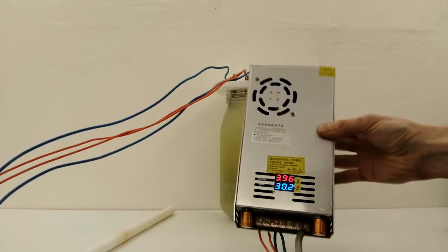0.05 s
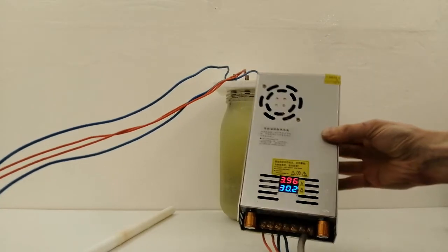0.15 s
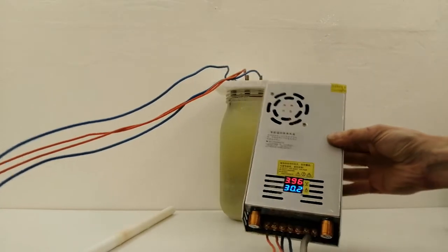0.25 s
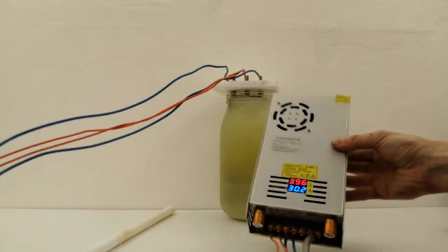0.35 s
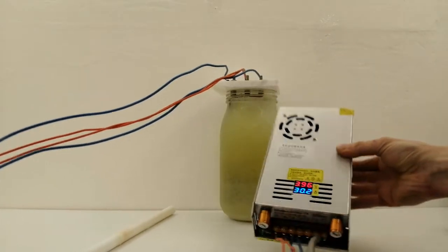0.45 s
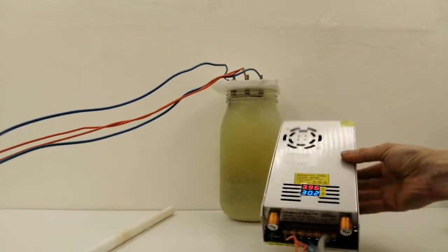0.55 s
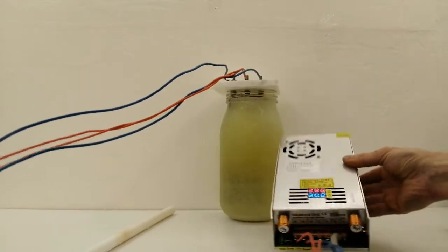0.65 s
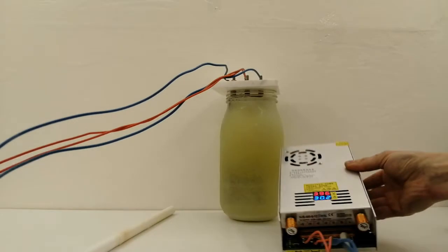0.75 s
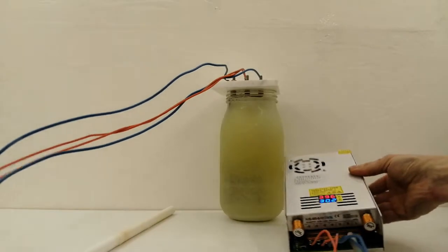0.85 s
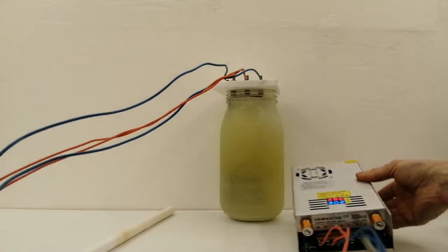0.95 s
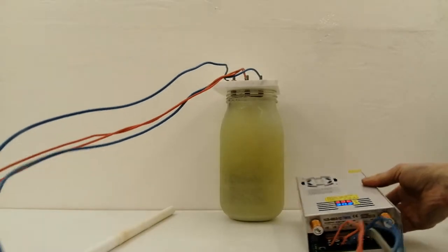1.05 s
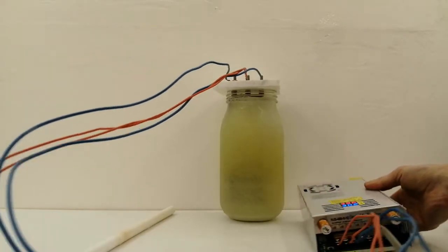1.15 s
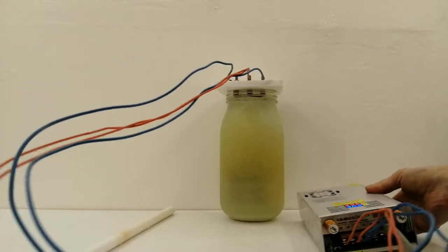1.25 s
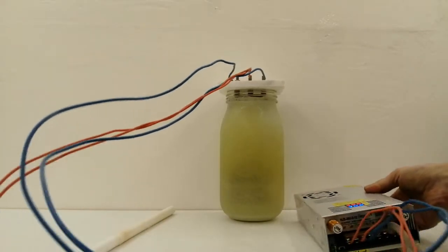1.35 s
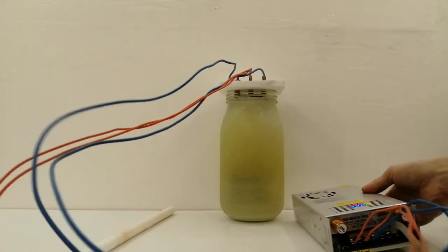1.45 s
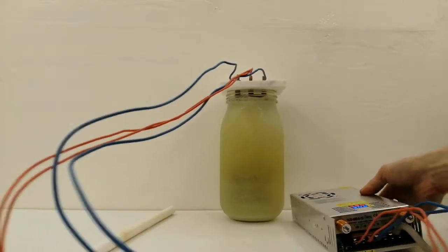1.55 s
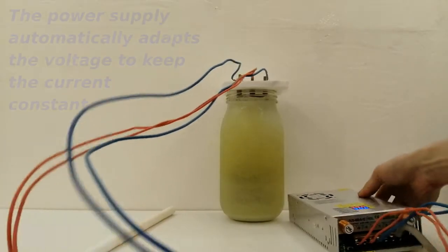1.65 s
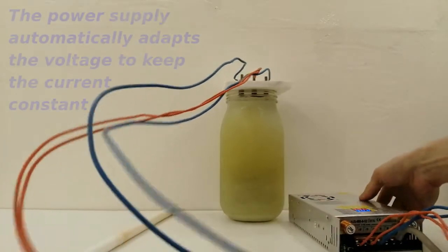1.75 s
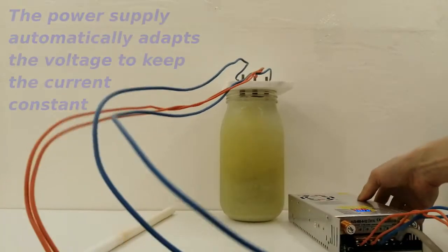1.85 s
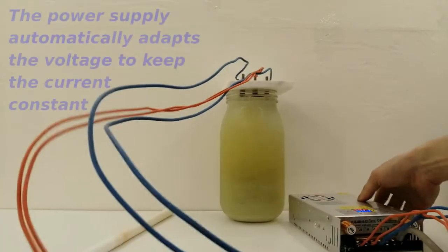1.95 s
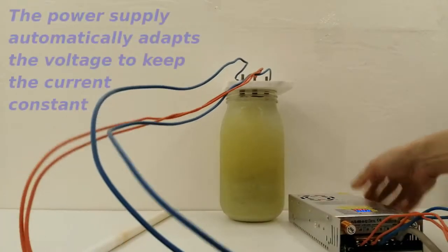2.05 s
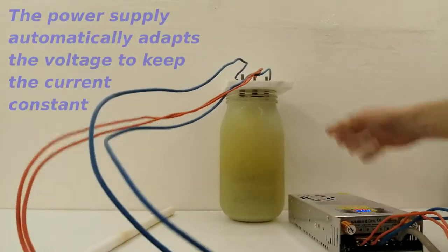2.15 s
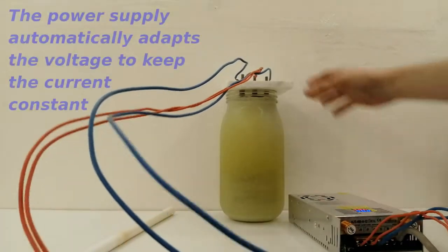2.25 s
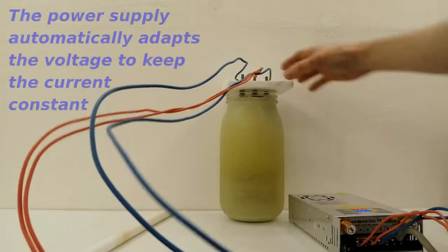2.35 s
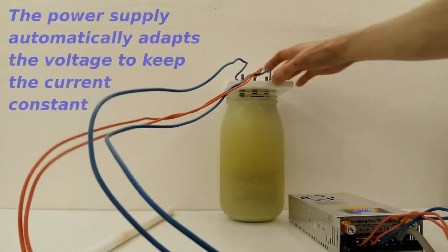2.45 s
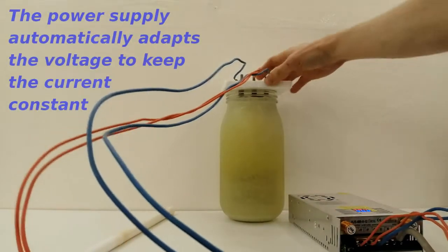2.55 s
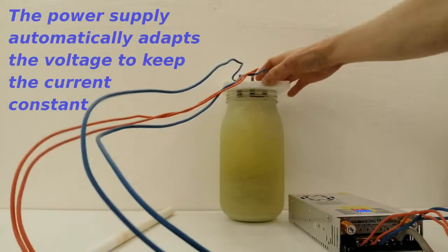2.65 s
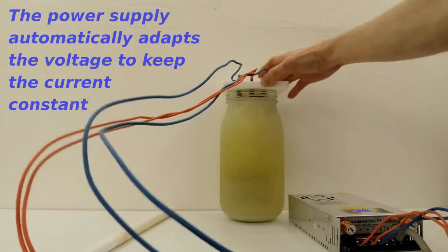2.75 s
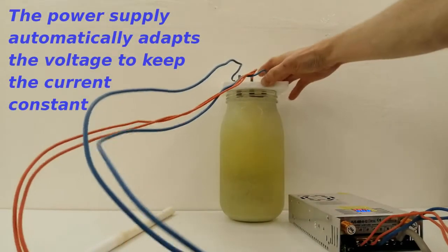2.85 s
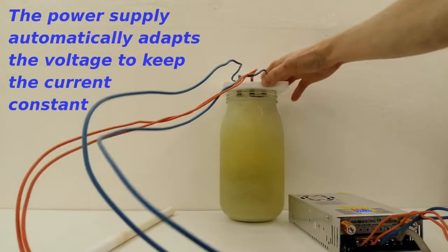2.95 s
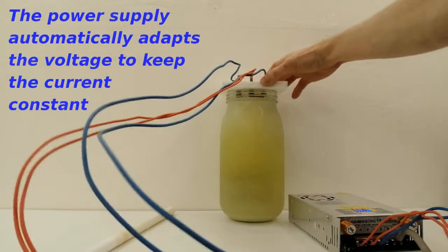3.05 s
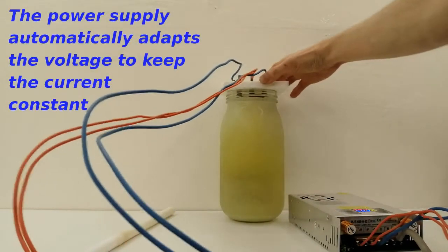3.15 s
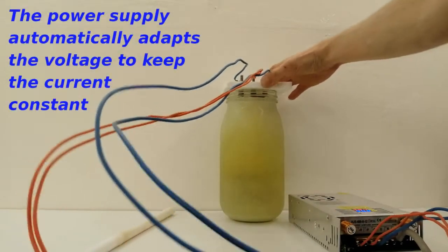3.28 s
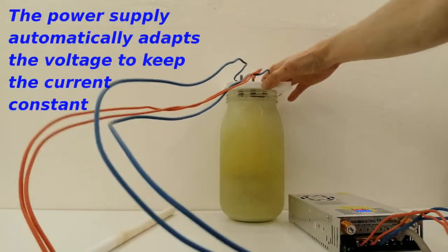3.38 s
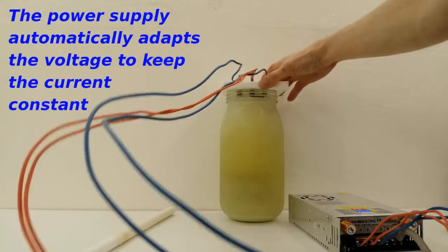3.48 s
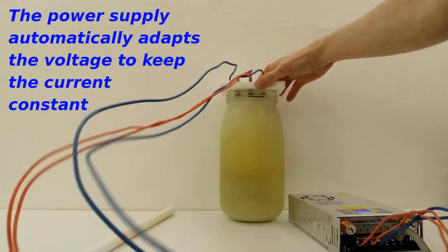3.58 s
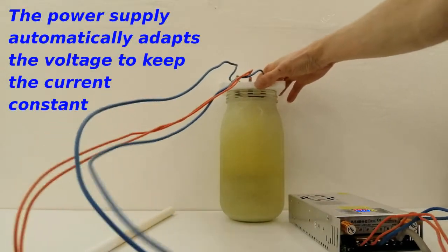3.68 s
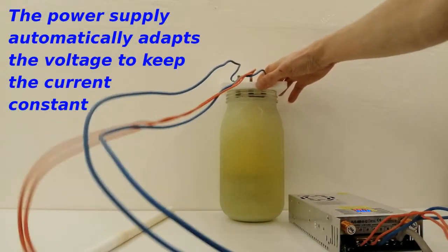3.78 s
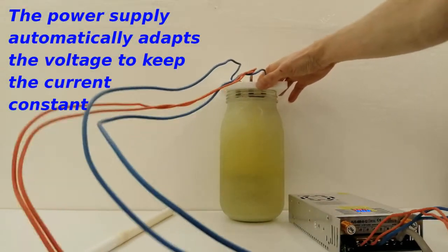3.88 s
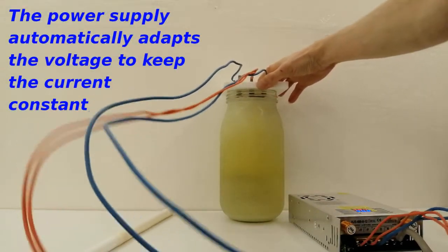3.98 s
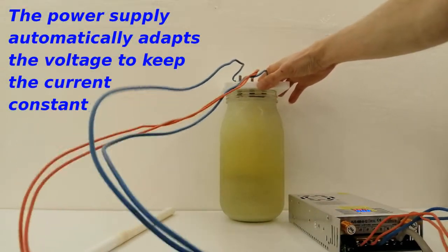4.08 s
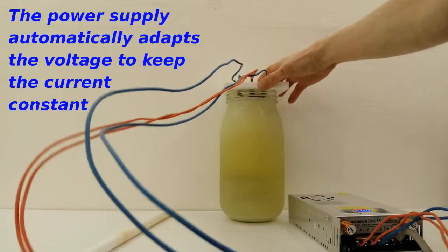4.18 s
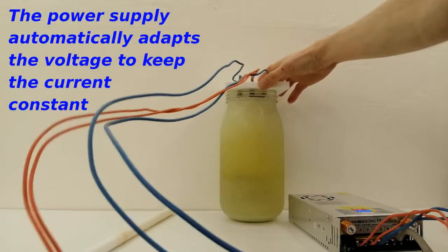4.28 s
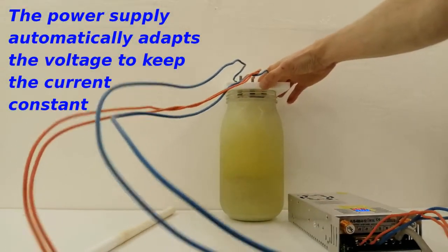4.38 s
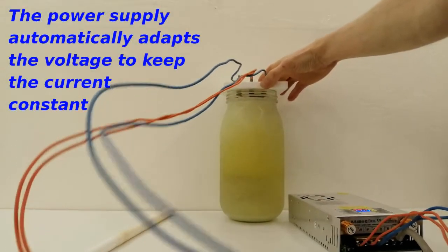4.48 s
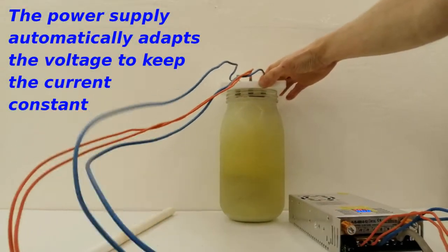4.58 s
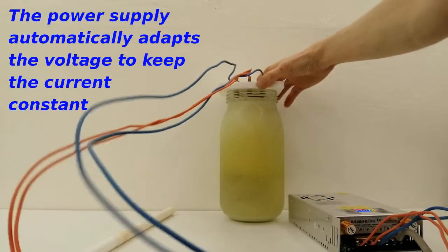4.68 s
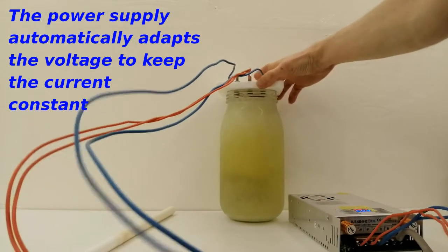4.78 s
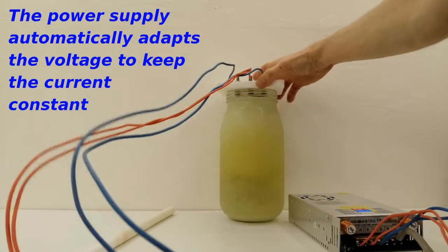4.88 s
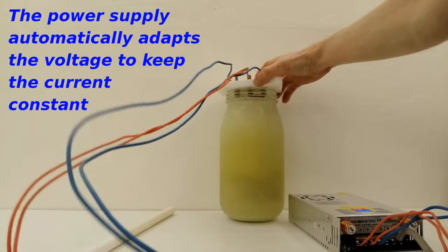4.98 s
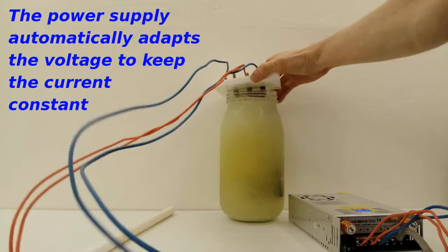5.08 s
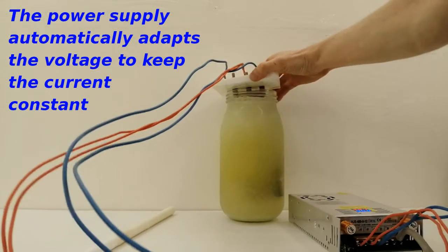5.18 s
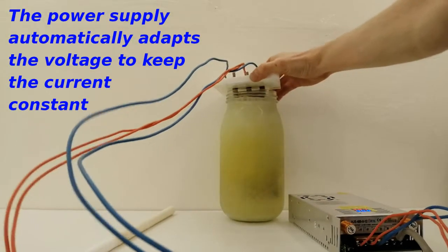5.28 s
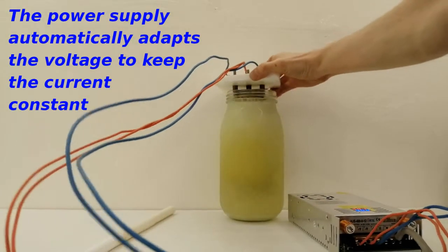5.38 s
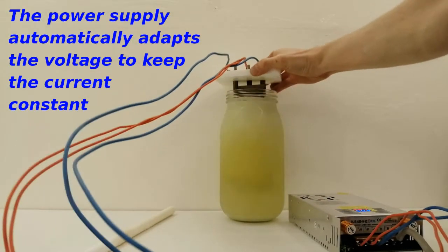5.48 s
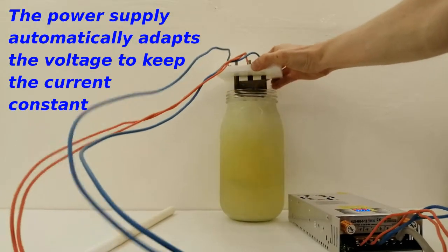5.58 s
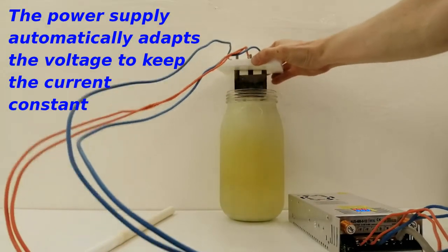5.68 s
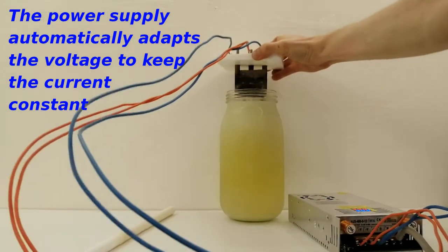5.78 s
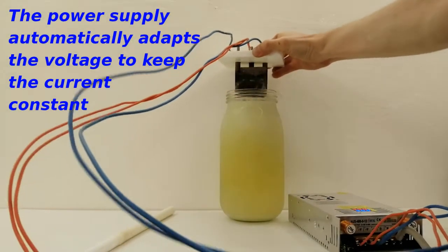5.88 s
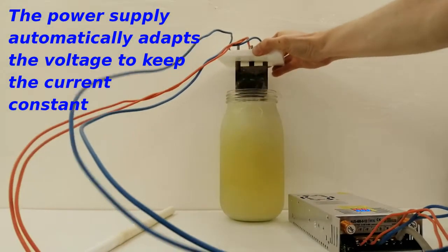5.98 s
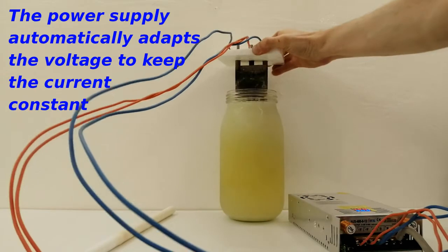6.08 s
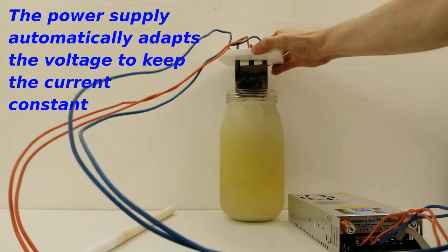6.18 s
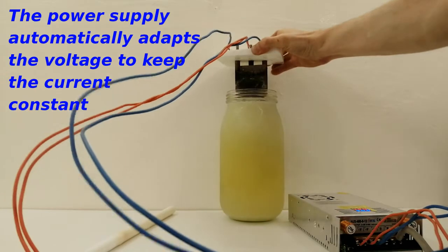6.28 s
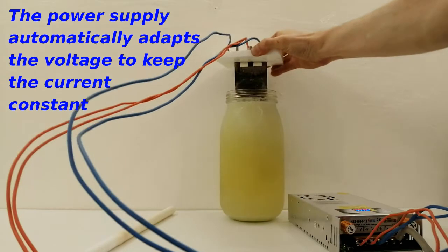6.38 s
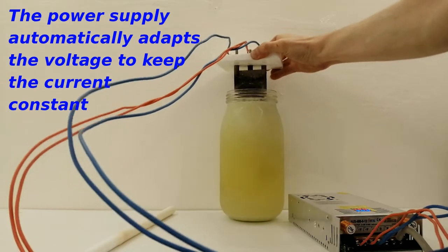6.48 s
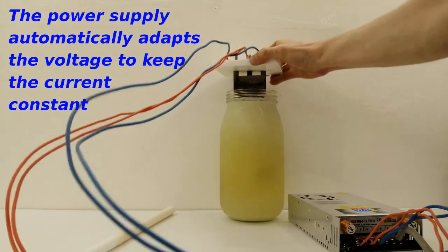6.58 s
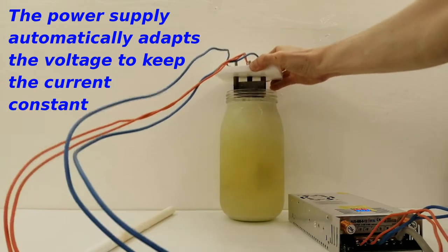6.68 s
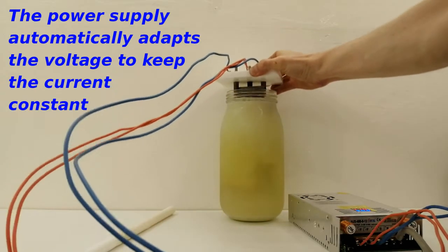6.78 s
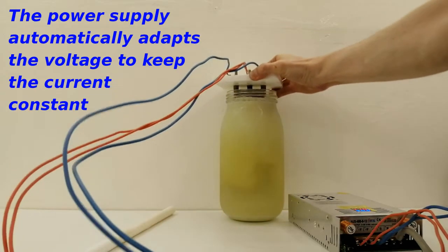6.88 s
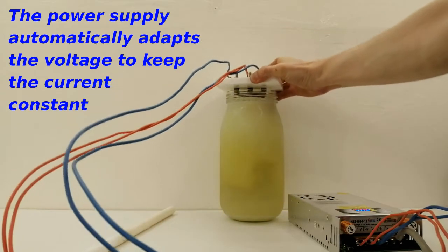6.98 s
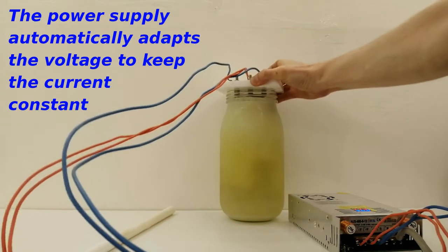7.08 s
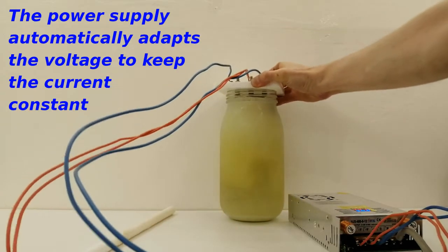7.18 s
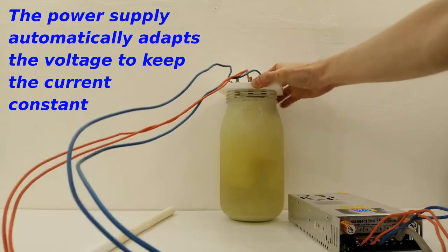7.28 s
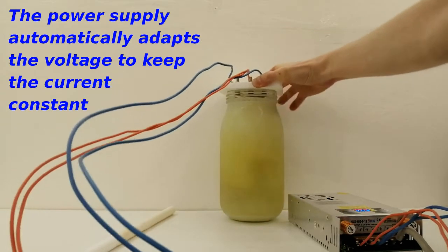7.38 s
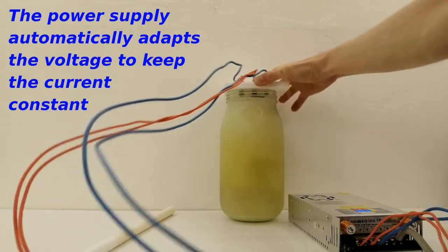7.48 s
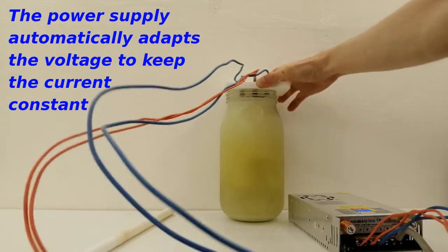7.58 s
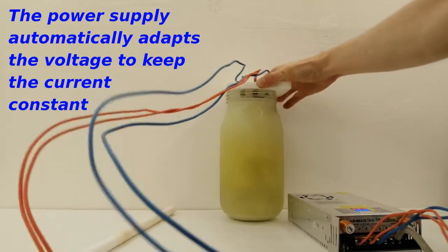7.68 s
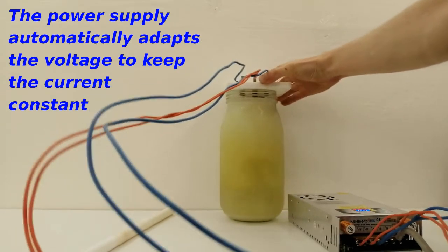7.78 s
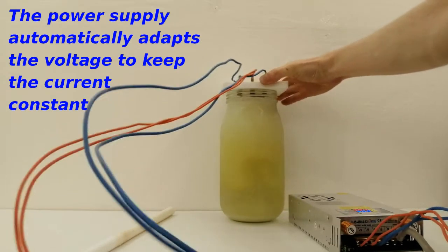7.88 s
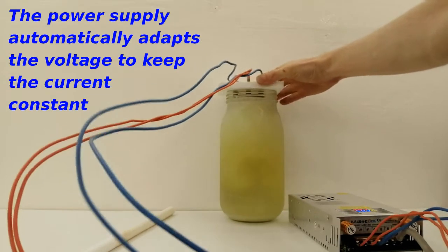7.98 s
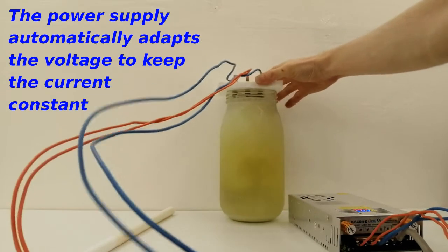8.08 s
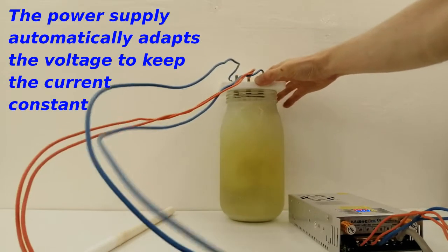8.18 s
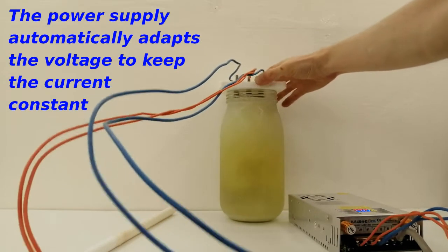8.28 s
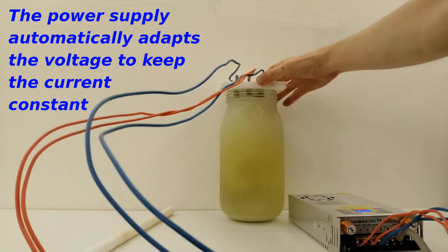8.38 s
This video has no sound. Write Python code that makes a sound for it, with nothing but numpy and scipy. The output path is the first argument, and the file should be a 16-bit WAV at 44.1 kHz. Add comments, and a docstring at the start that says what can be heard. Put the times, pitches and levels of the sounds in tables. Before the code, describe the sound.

A metal box knocks onto a table and scrapes aside, then a jar lid is tugged open, releasing bright fizz before knocking shut.

```python
"""Faint taps and short low tones over steady hiss, then a sheet-metal power supply knocks down on a
table in a small room, is shoved aside with drone and scrape, and let go. Fingers rub and tug the lid
off a glass electrolysis jar; open liquid fizzes, cutting out briefly, until the lid knocks back on.
Knocks are ringing modes plus a noise wash; rubs and fizz are coloured random grains; the low tones
and table sway are sines."""
import sys
import numpy as np
from scipy import signal
from scipy.fft import rfft, irfft, next_fast_len
from scipy.io import wavfile

SR = 44100
rng = np.random.default_rng(int(sys.argv[2]) if len(sys.argv) > 2 else 0)


def store_wav(level_fs):
    """Save 16-bit WAV to argv[1]."""
    pcm = np.round(np.clip(np.atleast_2d(level_fs), -1, 1) * 32767)
    wavfile.write(sys.argv[1], SR, pcm.T.astype(np.int16))


N = 372071
FFT_LEN = next_fast_len(N)
TIME_S, BIN_HZ = np.arange(N) / SR, np.fft.rfftfreq(FFT_LEN, 1 / SR)


def amp(db):
    """Decibels to gain."""
    return 10 ** (np.asarray(db) / 20)


def at_hz(points, hz):
    """Read a spectrum along a log-frequency axis."""
    f, value = np.transpose(points)
    return np.interp(np.log(np.maximum(hz, 1)), np.log(f), value)


def shaped(x, response):
    """Filter by a response given on the frequency bins."""
    return irfft(rfft(x, FFT_LEN) * response, FFT_LEN)[..., :N]


# left-right likeness: (frequency [Hz], correlation [-1..1])
LIKENESS = [(60, 0.75), (150, 0.44), (300, 0.87), (600, 0.18), (1200, 0.14), (3000, 0.22), (8000, .03)]


def stereo(mid, side, hz):
    """The channels are more alike in the bass than in the treble."""
    alike = np.clip(at_hz(LIKENESS, hz), -.99, .99)
    side = side * np.sqrt((1 - alike) / (1 + alike))
    return np.array([mid + side, mid - side])


def coloured(source, spectrum, body=1):
    """Two white sources, mid and side, take on a spectrum in dB per Hz, times a body response."""
    gain = amp(at_hz(spectrum, BIN_HZ)) * body * np.sqrt(SR / 2)
    mid, side = rfft(source, FFT_LEN) * gain
    return irfft(stereo(mid, side, BIN_HZ), FFT_LEN)[:, :N]


def grains(per_s, spread_db, room_t60_s=0.21):
    """Random tiny impacts of uneven size, each trailed by the room; mid and side, rms 1."""
    occurs = rng.random(N) < per_s / SR
    size = amp(spread_db * np.minimum(rng.exponential(1, N), 3))
    clicks = occurs * size * rng.choice([-1, 1], N)
    t = TIME_S[:SR // 4]
    room = rng.standard_normal((2, len(t))) * amp(-60 * t / room_t60_s)
    room[0, 0] = np.linalg.norm(room[0])   # direct sound, mid only
    x = signal.fftconvolve(clicks[None], room, axes=1)[:, :N]
    return x / x.std(axis=1, keepdims=True)


def resonant(modes, lift_db, width_hz):
    """Response of a rubbed body: its modes stand out, broadened by the touch."""
    response = 1
    for hz, db, _ in modes:
        response = response + amp(lift_db + db) / (1 + (2 * (BIN_HZ - hz) / width_hz) ** 2)
    return response


def wavering(per_s, depth_db):
    """A gain that wanders at random."""
    steps = rng.standard_normal(N // 100)
    return amp(depth_db * np.interp(TIME_S * per_s, np.arange(len(steps)), steps))


def gestures(rows, rise_s, easing_db_per_s, stop_t60_s):
    """A hand movement speeds up, eases off and dies away; one gain in time per dB column."""
    out = 0
    for start_s, length_s, *levels_db in rows:
        t = np.maximum(TIME_S - start_s, 0)
        stop_db = 60 * np.maximum(t - length_s, 0) / np.array(stop_t60_s)[:, None]
        fall_db = np.minimum(easing_db_per_s * t + stop_db, 200)
        rise = np.minimum(t / rise_s, 1)
        out = np.maximum(out, amp(levels_db)[:, None] * rise * amp(-fall_db))
    return out


def force(hz, force_db, weight_db, contact_hz, resonance_db, click_db, click):
    """Blow spectrum: a push peaking near the contact pitch and falling above, plus an edge click."""
    weight = weight_db / (1 + (hz / 214) ** 4)   # mass behind the blow counts below 214 Hz
    octaves = np.log2(hz / contact_hz)
    spring = resonance_db * np.exp(-octaves ** 2)   # 1 octave half-width
    push = amp(force_db + weight + spring) / np.hypot(1, (hz / contact_hz) ** 3.05)
    return np.hypot(push, amp(click_db + at_hz(click, hz)))


def early_one(x):
    """Scale a blow to rms 1 over its first 40 ms."""
    return x / np.sqrt(np.mean(x[..., :SR // 25] ** 2, axis=-1, keepdims=True))


# room decay: (frequency [Hz], t60 [s])
ROOM_T60 = [(80, 0.41), (210, 0.34), (560, 0.29), (1500, 0.16), (4000, 0.12), (10000, 0.12)]


def blows(rows, modes, wash, click, ring_db, wash_db, swell_cycles):
    """Each blow rings the body's modes and a wash of reflections; lows build later, last longer."""
    build_up_cycles, direct_gain = 1.2, 0.85   # direct: extra gain at the start of the wash
    out, t = np.zeros((2, N + SR)), TIME_S[:SR * 2 // 3]
    edges_hz = 45 * 2 ** np.arange(0, 9, .5)
    bank = []
    for low, high in zip(edges_hz, edges_hz[1:]):
        sos = signal.butter(2, [low, high], "band", fs=SR, output="sos")
        bank.append((np.sqrt(low * high), high - low, sos))
    first_arrivals = 1 + direct_gain * np.exp(-t / 0.0021)
    for start_s, *touch, contact_s, pan_db in rows:
        white, hit = rng.standard_normal((2, 2, len(t))), 0
        contact = 1 - np.exp(-t / max(contact_s, 1e-4))
        for k, (hz, width_hz, sos) in enumerate(bank):
            build_up = 1 - np.exp(-t * hz / build_up_cycles)
            fade = contact * build_up * first_arrivals * amp(-60 * t / at_hz(ROOM_T60, hz))
            band = early_one(signal.sosfilt(sos, white[k % 2] * fade))   # neighbours differ in noise
            gain = force(hz, *touch, click) * amp(wash_db + at_hz(wash, hz)) * np.sqrt(width_hz)
            hit = hit + gain * stereo(*band, hz)
        phases = rng.random((len(modes), 2, 1))   # turns, for mid and side
        for (hz, db, t60_s), turn in zip(modes, phases):
            swell = contact * (1 - np.exp(-t * hz / swell_cycles))
            tone = np.sin(2 * np.pi * (hz * t + turn))
            ring = early_one(tone * swell * amp(-60 * t / t60_s))
            gain = force(hz, *touch, click) * amp(ring_db + db) * np.sqrt(hz)
            hit = hit + gain * stereo(*ring, hz)
        start = int(start_s * SR)
        out[:, start:start + len(t)] += hit * amp(pan_db * np.array([[.5], [-.5]]))
    return out[:, :N]


# steady hiss: (frequency [Hz], level [dB per Hz])
HISS = [(25, -86.5), (60, -96), (100, -100), (230, -98.5), (400, -101), (650, -105), (1000, -107),
        (2000, -109.5), (4000, -110), (6300, -112), (10000, -114), (15000, -114)]


def steady_hiss():
    """Stationary noise with a fixed spectrum."""
    return coloured(rng.standard_normal((2, N)), HISS)


# tugs at the lid: (time [s], level [dB])
TUGS = [(4.831, -25.5), (4.895, -15.5), (7.529, -31.5)]
# table top wobble: (frequency [Hz], level [dB], t60 [s])
SWAY_MODES = [(28, -15, 0.67), (41.8, 7.5, 0.049), (65.7, -13, 0.21)]


def table_sway():
    """A tug leaves the table top wobbling at a few very low pitches."""
    out = np.zeros(N)
    for start_s, tug_db in TUGS:
        t = np.maximum(TIME_S - start_s, 0)
        pull = 1 - np.exp(-t / 0.033)
        for hz, db, t60_s in SWAY_MODES:
            decay = amp(tug_db + db - 60 * np.minimum(t / t60_s, 3))
            out += pull * decay * np.sin(2 * np.pi * hz * t)
    return out


# short skin groans, and a faint jar ring after a tick or tug:
# (time of peak [s], frequency [Hz], level [dB], half length to 1/e [s])
LOW_TONES = [(0.45, 155, -61, 0.029), (0.642, 232, -66.5, 0.053), (2.872, 215, -53.5, 0.055),
             (3.394, 147, -56.5, 0.027), (3.665, 149.6, -60.5, 0.044), (4.296, 223.7, -63.5, 0.16),
             (4.937, 236.6, -44.5, 0.065), (7.297, 202, -34, 0.029), (7.9, 146.4, -49, 0.039),
             (8.142, 222, -49, 0.067)]


def low_tones():
    """Short skin groans and a faint jar ring: slightly unsteady sines that swell and fade."""
    out = np.zeros(N)
    for peak_s, hz, db, half_s in LOW_TONES:
        unsteady_rad = np.cumsum(rng.standard_normal(N)) * 0.0082
        envelope = np.exp(-np.minimum(((TIME_S - peak_s) / half_s) ** 2, 20))
        tone = np.sin(2 * np.pi * hz * TIME_S + unsteady_rad)
        out += amp(db) * np.sqrt(2) * envelope * tone
    return out


# lid opening: (time [s], gap [share of fully open])
LID_GAP = [(5.17, 0), (5.22, 0.0061), (5.5, 0.078), (5.8, 0), (6.3, 0.88), (6.75, 0.64), (7.0, 0.2),
           (7.2, 0.1), (7.23, 0.098)]
# bubble fizz and open-mouth spray, before gap and foam gains: (frequency [Hz], level [dB per Hz])
FIZZ = [(2000, -125), (3800, -106), (5500, -99), (7000, -96.5), (9000, -103), (12000, -110), (15000, -112)]
MOUTH = [(400, -116), (1000, -111), (1600, -105), (2700, -99), (4000, -99), (7000, -106), (10000, -104),
         (15000, -105)]


def electrolyte():
    """Countless tiny bubbles burst under the lid gap; the open mouth adds a broader spray."""
    time_s, share = np.transpose(LID_GAP)
    gap = np.clip(np.interp(TIME_S, time_s, share), 0, 1)
    gap *= (TIME_S > time_s[0]) * (TIME_S < time_s[-1])
    foam_db = -5 * np.maximum(TIME_S - time_s[0], 0)   # foam settles at 5 dB/s
    fizz = coloured(grains(per_s=4000, spread_db=3.5), FIZZ)
    spray = coloured(grains(per_s=3300, spread_db=3.0), MOUTH)
    return amp(6 + foam_db) * gap ** 0.071 * fizz + amp(5 + foam_db) * gap ** 0.15 * spray


# case blows: (time [s], force [dB], extra bass weight [dB], contact pitch [Hz],
# contact resonance [dB], edge click [dB], contact time constant [s], left over right [dB])
CASE_BLOWS = [(0.056, -82, -10, 1350, -6.5, -98.5, 0.0062, -1),
              (0.121, -86.5, -41, 345, 13.5, -116, 0.0027, 0), (0.164, -94.5, 1, 1000, 2, -99, 0.003, 2),
              (0.362, -99, 4, 1200, -1, -99, 0.003, -2), (0.942, -50, -13, 580, -8, -75.5, 0.0034, -1.5),
              (1.401, -55.5, -12.5, 1000, 3, -75.5, 0.00066, 1.5),
              (1.421, -60.5, -17.5, 387, 10, -83, 0.00083, -1.5),
              (1.769, -76, -13, 280, 9.5, -76.5, 0.001, 0.2), (1.865, -61.5, 3.5, 380, -2, -66, 0.001, 0),
              (1.886, -60, -2.5, 313, 1.5, -78.5, 0.0014, -3.5)]
# case ringing on the table: (frequency [Hz], level [dB], t60 [s])
CASE_MODES = [(93, 10, 0.44), (195, -8, 0.16), (225, 5, 0.36), (285, 6.5, 0.12), (323.4, 6.5, 0.23),
              (378, -5.5, 0.45), (426.5, 2.5, 0.22), (539, -3, 0.16), (589.4, -2.5, 0.066),
              (716, -10.5, 0.21), (850, -7, .21), (925, -7, 0.24), (1030, -2.5, 0.067), (1285, -5, 0.085),
              (2370, -4.5, 0.16), (2610, -13, 0.067), (3190, -7, 0.11), (7600, -9, 0.068)]
# dense higher modes and reflections; hard-edge click on metal: (frequency [Hz], level [dB])
CASE_WASH = [(55, -11.5), (100, -2), (160, -4.5), (300, -5.5), (800, 0.5), (2800, 7), (6500, -7.5),
             (10000, -1), (15000, -5.5)]
CASE_CLICK = [(600, -2.5), (1200, -5), (2600, -8), (6100, -8)]
# shoves over the table: (start [s], length [s], drag [dB], grit [dB])
SHOVES = [(0.955, 0.12, 1.5, -8), (1.015, 0.39, 4.5, 6.5), (1.245, 0.1, 3, 5), (1.525, 0.15, -2, 6),
          (1.685, 0.049, -0.5, 1.5)]
# dying away after a shove: (drag t60 [s], grit t60 [s])
SHOVE_STOP_T60_S = [0.39, 1]
# sliding spectra, before body and shove gains: (frequency [Hz], level [dB per Hz])
DRAG = [(35, -102.5), (65, -77.5), (95, -94), (150, -80.5), (220, -81.5), (320, -82), (420, -83.5),
        (900, -82), (1600, -101)]
GRIT = [(500, -105), (1100, -87), (1700, -89), (2500, -90), (4000, -94), (6500, -99), (10000, -101),
        (15000, -105)]


def power_supply():
    """The case knocks on the table; sliding, it drones in its modes as grit catches and slips."""
    drag, grit = gestures(SHOVES, rise_s=0.028, easing_db_per_s=25, stop_t60_s=SHOVE_STOP_T60_S)
    drag_body = resonant(CASE_MODES, lift_db=14.0, width_hz=15.0)
    drone = drag * coloured(grains(per_s=870, spread_db=3.5), DRAG, drag_body)
    grit_body = resonant(CASE_MODES, lift_db=9, width_hz=11.0)
    scratch = grit * coloured(grains(per_s=1700, spread_db=3.5), GRIT, grit_body)
    scratch *= wavering(per_s=51, depth_db=1.05)
    knocks = blows(CASE_BLOWS, CASE_MODES, CASE_WASH, CASE_CLICK,
                   ring_db=-11.0, wash_db=-6.5, swell_cycles=0.95)
    return (drone + scratch) * amp(np.array([[-.6], [.6]])) + knocks


# lid and fingers on the jar; wired terminals ticking in the lid: (time [s], force [dB],
# extra bass weight [dB], contact pitch [Hz], contact resonance [dB], edge click [dB],
# contact time constant [s], left over right [dB])
JAR_BLOWS = [(2.669, -93.5, 27, 660, 8, -108, 0.0031, 3), (2.709, -77.5, -8, 477, -3, -101, 0.004, -9),
             (2.853, -69.5, 4, 362, 1, -109, 0.006, 0.5), (2.981, -87, 7, 417, 3.5, -114, 0.0031, -16),
             (4.471, -77, 8, 625, 2, -101, 0.0017, -4), (4.833, -65, -5.5, 260, 10, -92, 0.0046, -2.5),
             (4.894, -66.5, 0.5, 414, 7.5, -84.5, 0.003, -3), (5.136, -69, -4, 1100, -5, -68.5, 0.025, 0),
             (5.177, -59.5, 4, 1310, 12, -54, 0.0013, -0.5), (7.217, -57.5, 5, 850, 14, -76, 0.0024, -1),
             (7.318, -70, 10, 300, -5, -91, 0.0022, -1), (7.362, -66, 6, 704, 8, -104, 0.00081, 0),
             (7.625, -64.5, 6.5, 570, 4, -86.5, 0.0015, 0), (7.864, -70.5, -1, 337, 4, -110, 0.0043, 5)]
TERMINAL_TICKS = [(2.741, -87.5, -6, 550, 3, -99, 0.0031, -1), (2.791, -79, -12, 450, 1, -89, 0.0039, 0.5),
                  (3.221, -99, 0, 595, -5, -98, 0.0029, -6), (4.186, -77, -7, 790, 2.5, -78.5, 0.01, -1),
                  (8.0, -85, -14, 645, 15.5, -94, 0.0057, 1.5),
                  (8.087, -79, -6.5, 474, 7.5, -98, 0.005, -1)]
# ringing of the jar on the table, of the terminals: (frequency [Hz], level [dB], t60 [s])
JAR_MODES = [(89.7, 1.5, 0.59), (145.7, 4.5, 0.39), (211.4, -4, 0.22), (233.2, 0, 0.67), (430, 1.5, 0.32),
             (491.5, 2, 0.16), (576, -2.5, 0.29), (572, -3, 0.06), (755, -3.5, 0.19), (838, -5, 0.089),
             (888, -2, 0.19), (1023, -12, 0.29), (1175, -14.5, 0.17), (1400, -9.5, 0.13),
             (1523, -9.5, 0.19), (1670, -20, .17), (6080, -12, 0.097)]
TERMINAL_MODES = [(222.7, -6, 0.61), (488, -12, 0.31), (735, -12, 0.21), (1190, -7, 0.098),
                  (1740, -15, 0.088), (1896, -13.5, 0.13), (2120, -28, 0.045), (2086, -33, 0.15),
                  (2940, -27, 0.099)]
# dense higher modes and reflections; hard-edge click on glass: (frequency [Hz], level [dB])
JAR_WASH = [(55, -16), (100, 3.5), (160, -3.5), (300, 5.5), (600, 3), (1400, -1.5), (2000, -4), (3000, -12),
            (6500, -1), (10000, -11.5), (15000, -23)]
JAR_CLICK = [(600, -34), (1300, -2.5), (2400, 7.5), (6100, -8)]
# finger and wire strokes: (start [s], length [s], soft rub [dB], dry rub [dB])
STROKES = [(0.39, 0.082, -59, -88.5), (0.59, 0.3, -74.5, -90.5), (2.655, 0.25, -63, -83),
           (2.83, 0.07, -68, -87), (2.95, 0.061, -68, -79), (3.11, 0.26, -74, -81), (3.61, 0.14, -70, -89),
           (3.735, 0.026, -69.5, -85.5), (3.825, 0.034, -67.5, -98), (4.47, 0.06, -65, -76.5),
           (4.55, 0.097, -65, -93), (5.72, 0.44, -79, -92), (7.54, 0.092, -61, -82),
           (7.865, 0.049, -51.5, -75.5), (7.965, 0.12, -55.5, -70.5), (8.275, 0.024, -68, -85)]
# dying away after a stroke: (soft rub t60 [s], dry rub t60 [s])
STROKE_STOP_T60_S = [0.22, 0.73]
# rub spectra, before body and stroke gains: (frequency [Hz], level [dB per Hz])
SOFT_RUB = [(40, -39), (90, -30.5), (150, -24), (230, -22.5), (350, -24), (600, -48), (1200, -67)]
DRY_RUB = [(200, -21), (450, -2), (650, -25.5), (900, -22), (1300, -59), (2000, -40), (4000, -72)]


def jar_lid():
    """The lid knocks on the glass, its terminals tick, and fingers and wires rub in short strokes."""
    soft, dry = gestures(STROKES, rise_s=0.023, easing_db_per_s=10.5, stop_t60_s=STROKE_STOP_T60_S)
    body = resonant(JAR_MODES, lift_db=4.0, width_hz=12.3)
    rub = soft * coloured(grains(per_s=500, spread_db=4.5), SOFT_RUB, body)
    rub += dry * coloured(grains(per_s=630, spread_db=5), DRY_RUB, body)
    knocks = blows(JAR_BLOWS, JAR_MODES, JAR_WASH, JAR_CLICK,
                   ring_db=-16, wash_db=-14.0, swell_cycles=1.0)
    # small terminals ping more than they clatter
    ticks = blows(TERMINAL_TICKS, TERMINAL_MODES, JAR_WASH, JAR_CLICK,
                  ring_db=0, wash_db=-8, swell_cycles=5.4)
    return rub + knocks + ticks


# wall behind the table: (delay [s], level [dB])
WALL_ECHOES = [(.0058, -13.5), (.028, -24.5)]


def with_wall(x):
    """The sound plus its first distinct echoes, thinned in the bass."""
    response = 1
    for delay_s, db in WALL_ECHOES:
        delayed = np.exp(-2j * np.pi * BIN_HZ * delay_s)
        response = response + amp(db) * delayed * BIN_HZ / (BIN_HZ + 500)
    return shaped(x, response)


def scene():
    """Everything on the table, over a steady hiss."""
    background = steady_hiss() + table_sway() + low_tones()
    return background + electrolyte() + with_wall(power_supply() + jar_lid())


# microphone colouring: (frequency [Hz], level [dB])
MICROPHONE = [(2000, -1.5), (3100, 0.5), (3700, -5.5), (4400, -4), (5100, 4), (7250, 6), (7900, -3.5),
              (9500, -6.5), (13800, -6), (14800, -0.5), (15600, -6.5)]


def record(dry):
    """The microphone's ports colour the treble; the extremes are cut."""
    cutoff_hz = 15850
    x = signal.sosfilt(signal.butter(1, 12, "high", fs=SR, output="sos"), dry)
    return shaped(x, amp(at_hz(MICROPHONE, BIN_HZ)) * (BIN_HZ < cutoff_hz))


dry = scene()
out = record(dry)
store_wav(out)
```